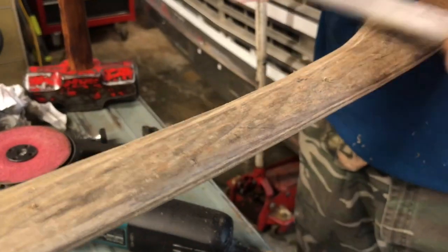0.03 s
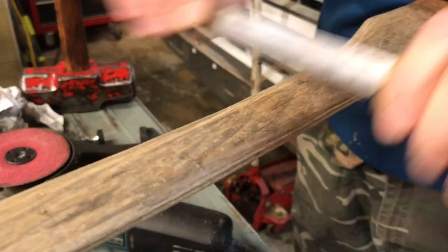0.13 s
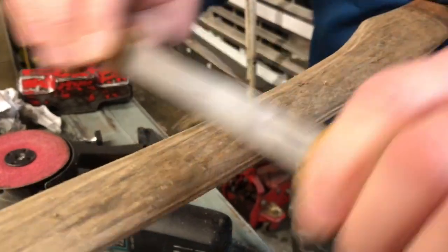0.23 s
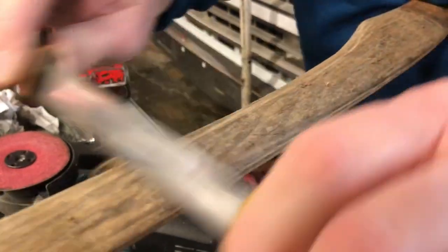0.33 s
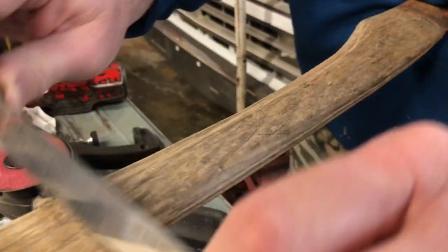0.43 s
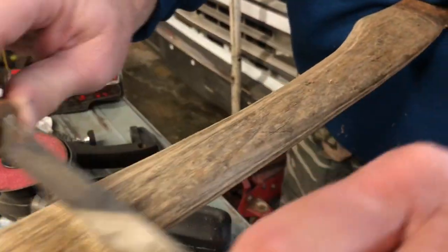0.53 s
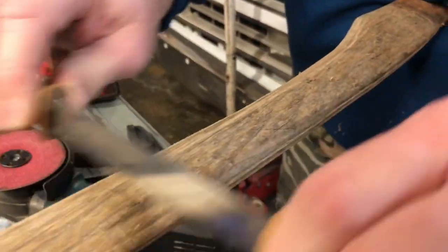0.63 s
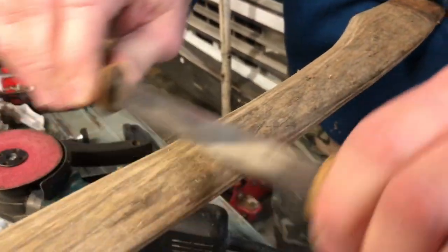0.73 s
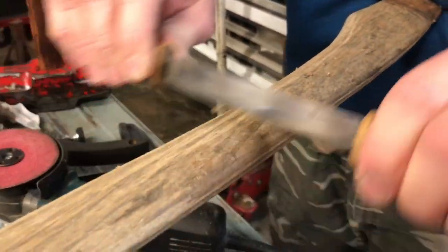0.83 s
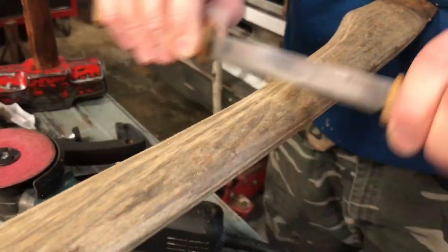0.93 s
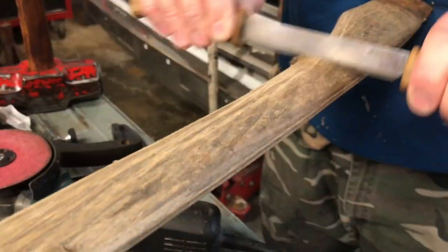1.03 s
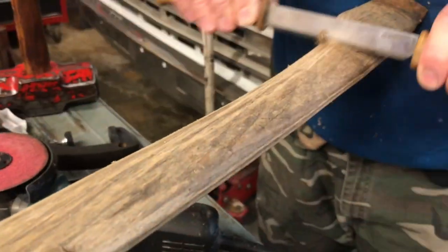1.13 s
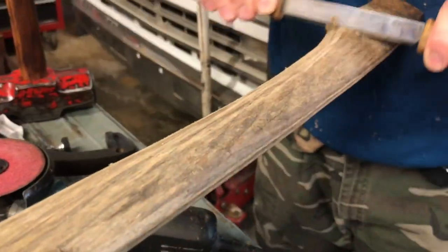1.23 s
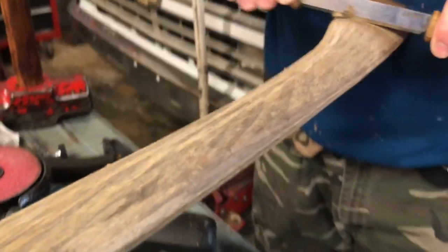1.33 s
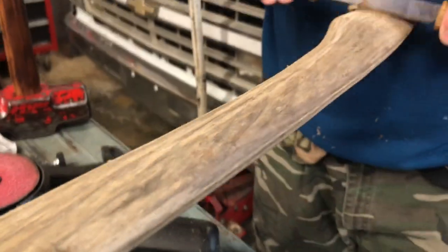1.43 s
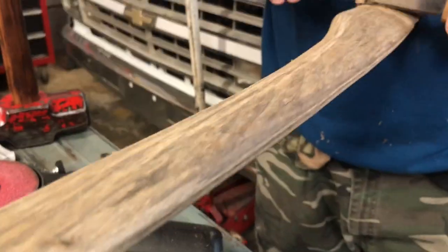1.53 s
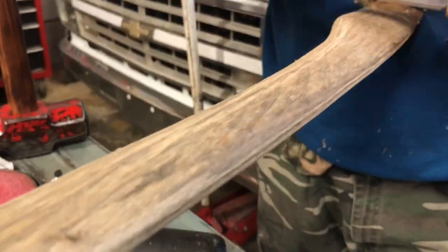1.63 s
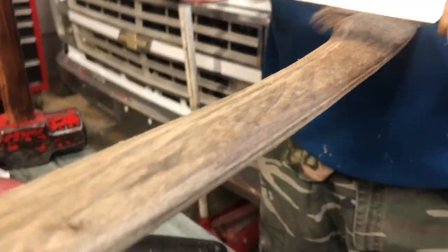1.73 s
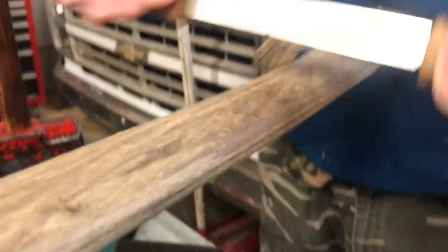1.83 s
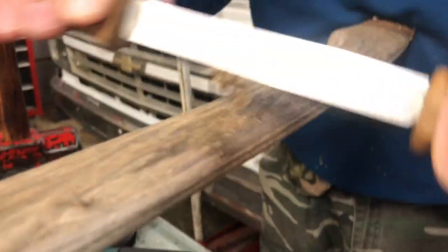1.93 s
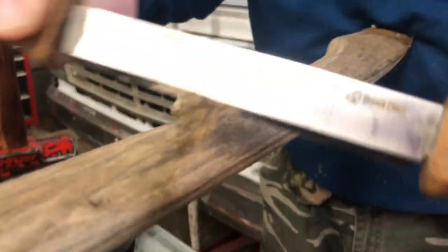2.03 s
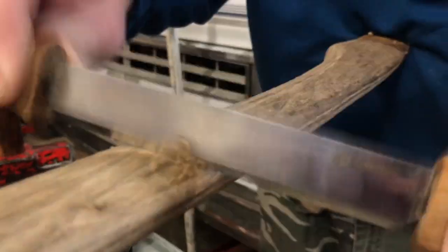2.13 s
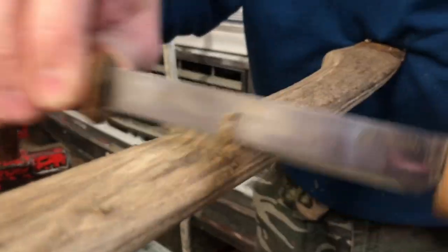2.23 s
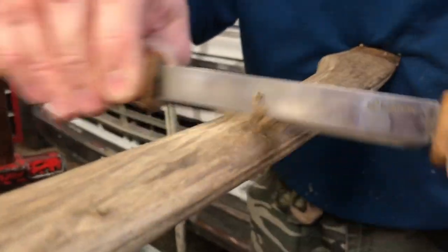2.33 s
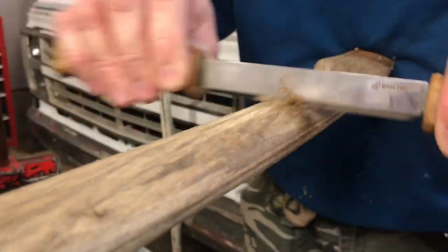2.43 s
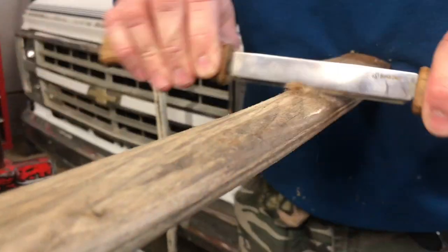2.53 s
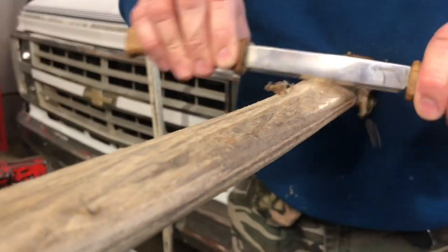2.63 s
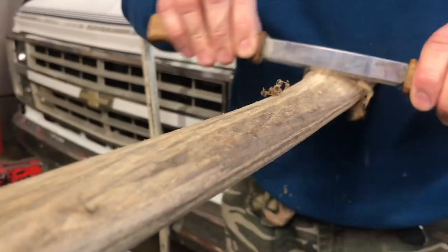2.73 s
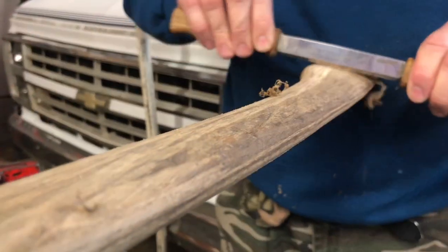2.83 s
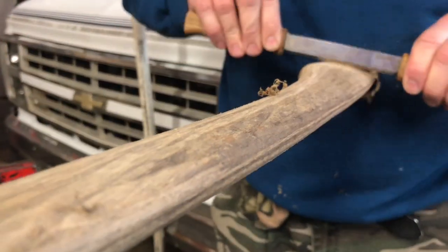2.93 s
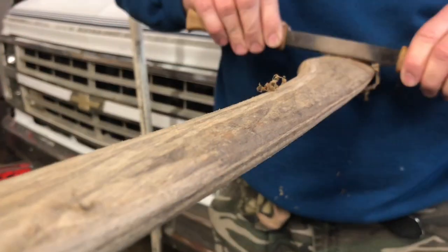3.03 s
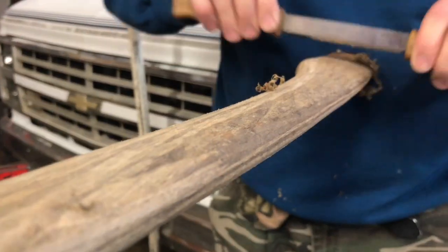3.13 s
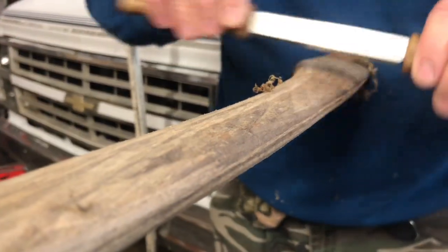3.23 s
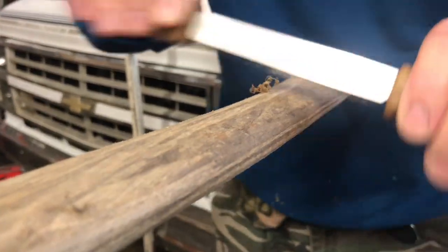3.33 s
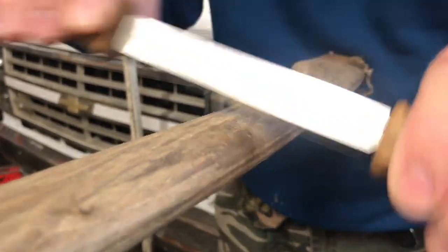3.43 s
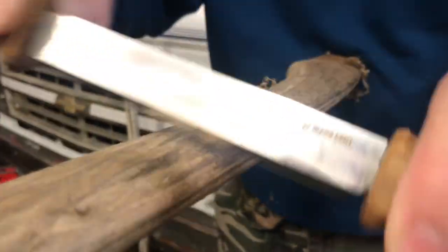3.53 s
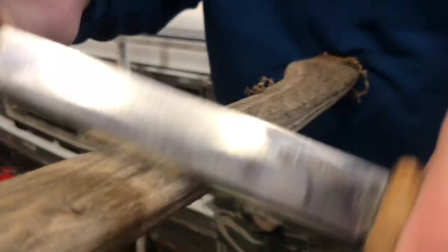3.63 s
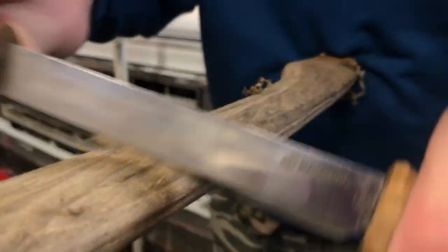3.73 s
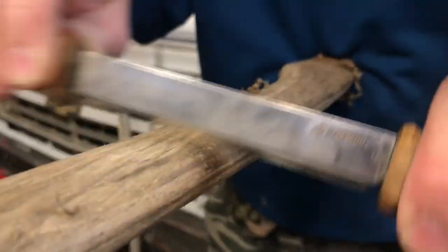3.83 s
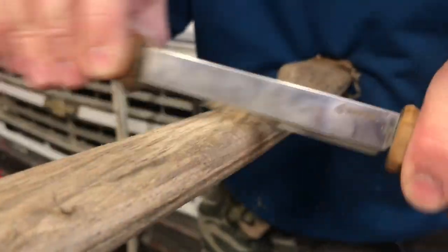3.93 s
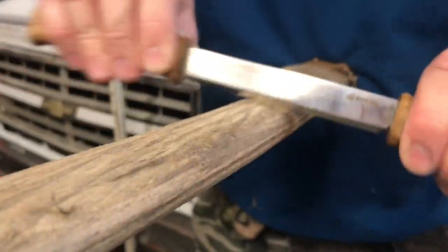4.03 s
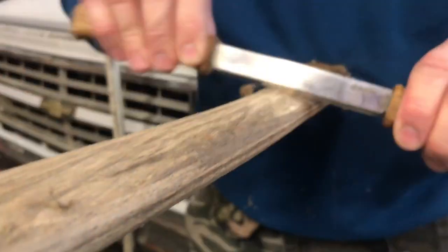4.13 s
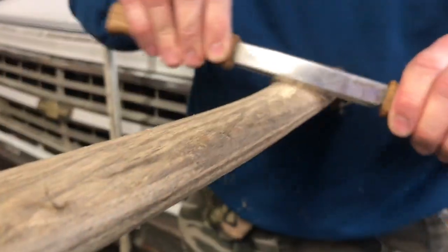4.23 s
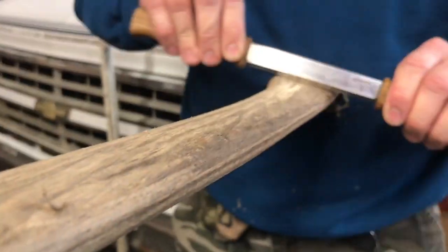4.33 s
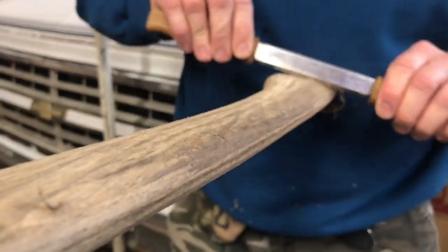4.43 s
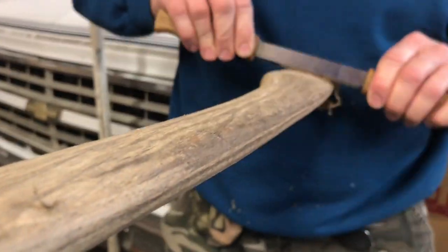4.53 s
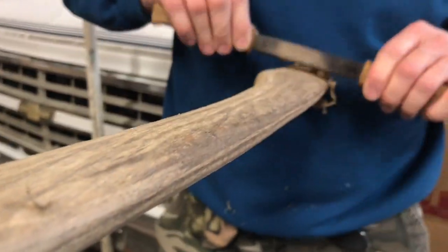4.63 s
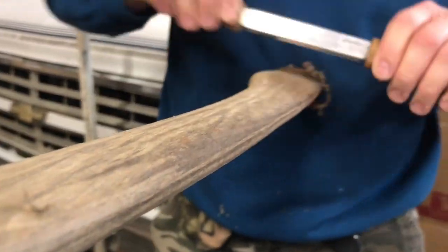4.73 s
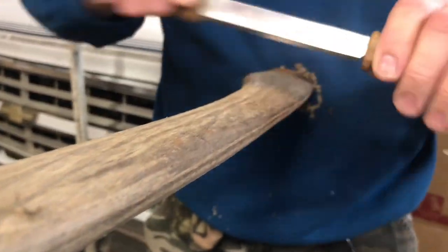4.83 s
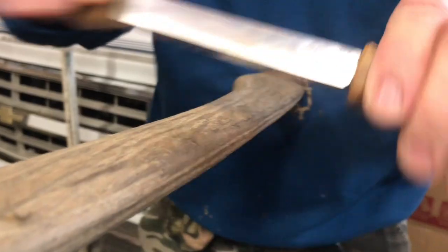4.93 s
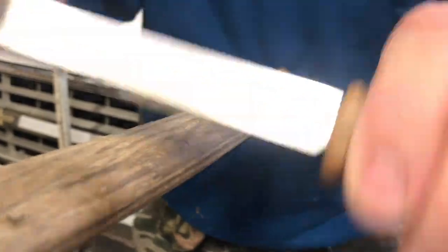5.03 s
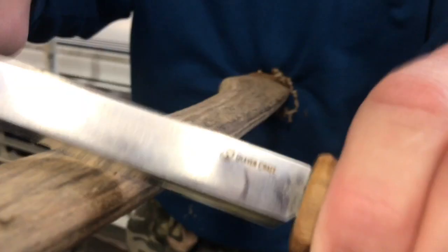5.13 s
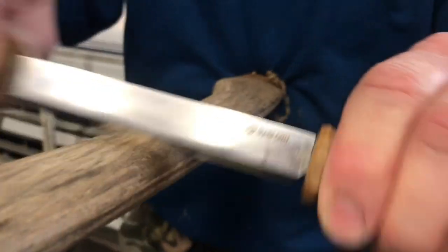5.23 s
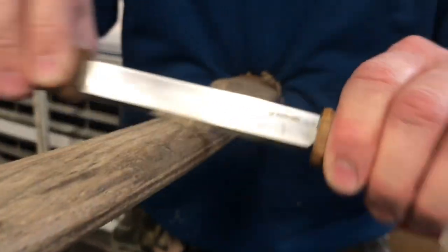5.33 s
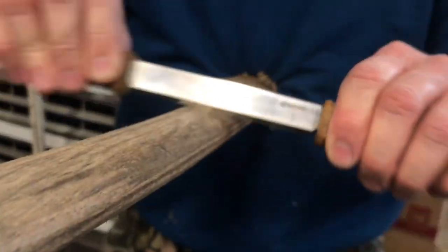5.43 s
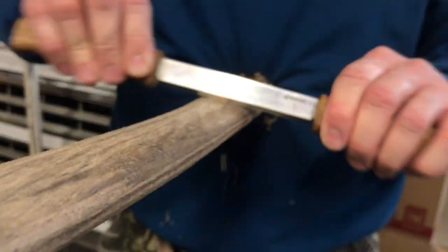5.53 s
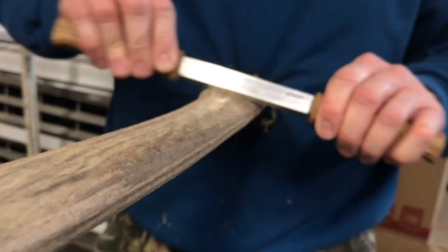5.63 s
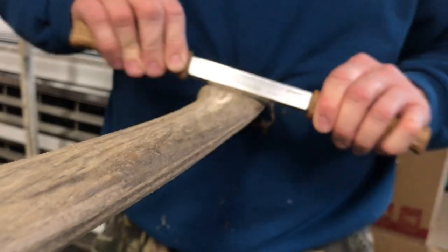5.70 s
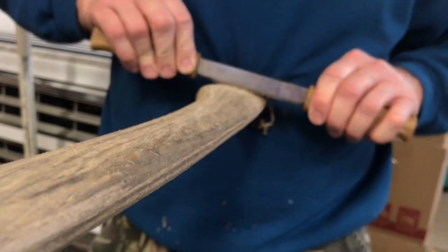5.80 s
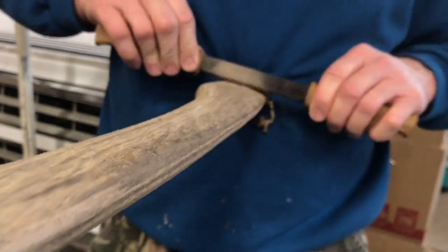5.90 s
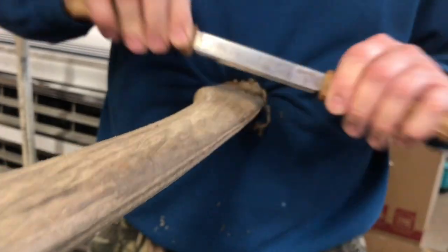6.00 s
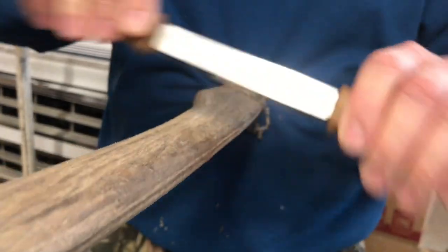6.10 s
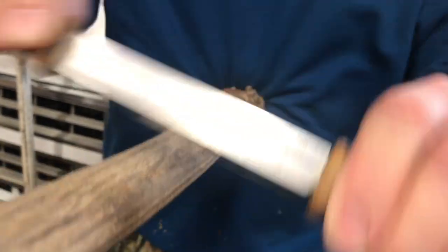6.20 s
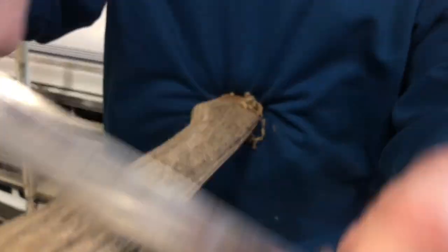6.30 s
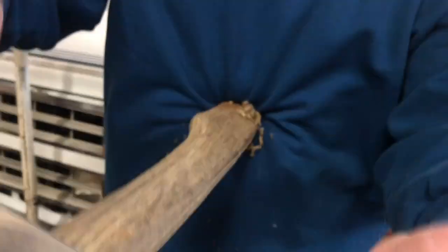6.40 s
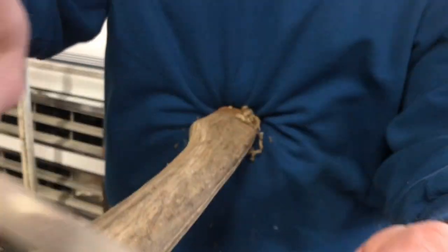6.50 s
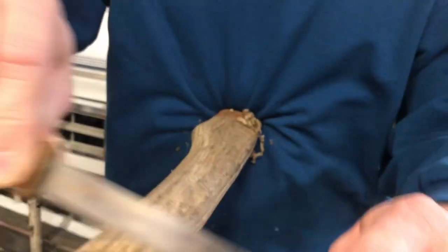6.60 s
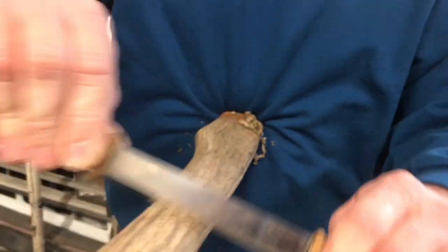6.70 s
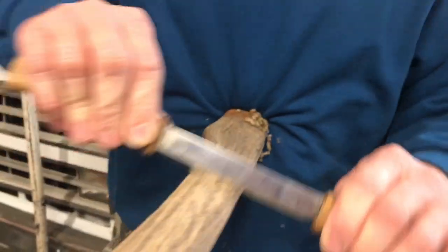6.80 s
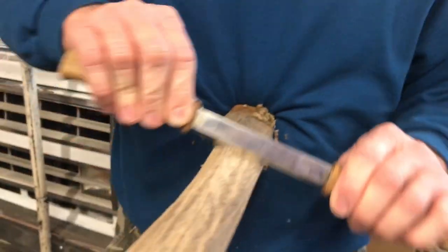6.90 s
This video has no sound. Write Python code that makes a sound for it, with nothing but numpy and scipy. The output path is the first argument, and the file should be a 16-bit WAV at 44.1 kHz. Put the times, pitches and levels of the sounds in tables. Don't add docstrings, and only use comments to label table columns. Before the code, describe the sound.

A small workshop, heard through a phone microphone close to the work, with low rumble, faint hiss and mains hum. Sleeves rustle softly and a few chips tick until 0.57 s, when a steel blade knocks onto a dry wooden handle and rasps along it until 1.6 s, gritty and chattering, with a dull bump near the end. Cloth rustles and the grip faintly squeaks. At 2.2 s comes the hardest clack with a loud crack, then a scrape to 3.1 s. A shaving snaps at 3.26 s. A duller landing at 3.7 s drags to 4.7 s; a brighter one at 5.2 s drags to 5.9 s. Crisp snaps cluster around 6.17 s, with quick brushing cloth. The lightest knock falls at 6.46 s, a splinter breaks sharply at 6.59 s, and the last scrape continues to about 6.96 s. The room adds only a short tail.

```python
import sys
import numpy as np
from scipy import signal
from scipy.fft import rfft, irfft
from scipy.io import wavfile
from scipy.ndimage import uniform_filter1d

SR = 44100
rng = np.random.default_rng(int(sys.argv[2]) if len(sys.argv) > 2 else 0)


def digitize_waveform(pressure):
    field = np.atleast_2d(pressure).T
    bounded = np.clip(field, -1, 1)
    quanta = np.round(bounded * 32767).astype(np.int16)
    wavfile.write(sys.argv[1], SR, quanta)


def elevation(decibels):
    levels = np.asarray(decibels, float)
    return 10 ** (levels / 20)


N = 306936

# start_s, end_s, first_db, last_db, bright_db
RUSTLES = [
    (0, 0.576, -58, -62.5, -4),
    (1.598, 2.183, -58.5, -67, 1),
    (2.169, 2.194, -57, -50, -1),
    (3.081, 3.268, -57, -56.5, 4),
    (3.269, 3.713, -55, -66.5, -1),
    (4.682, 5.168, -51.5, -78.5, -2.5),
    (5.938, 6.165, -51, -62, 0.5),
    (6.184, 6.362, -68, -71, 20.5),
    (6.201, 6.364, -65, -48, 11),
    (6.342, 6.443, -53, -88, 18),
]
# low_hz, high_hz
CLOTH_BANDS = [(400, 2000), (2000, 5500), (5500, 15800)]
# start_s, end_s, pitch_hz, width_hz, level_db
SQUEAKS = [
    (1.75, 1.94, 5600, 350, -73.5),
    (0, 0.45, 1100, 46, -66.5),
    (.1, .5, 1460, 70, -69),
    (3.27, 3.7, 880, 80, -64),
    (3.08, 3.26, 2300, 3000, -52),
    (3.28, 3.55, 4000, 1200, -70),
]
# frequency_hz, density_db (per Hz)
SHOP_AIR = [(13, -39), (22, -21.5), (49, 5.5), (88, -4), (141, 0), (306, -14), (361, -15), (829, -23),
            (1030, -20), (2440, -36.5), (4020, -37), (10300, -44.5), (12900, -41), (15200, -45.5),
            (16500, -50.5)]
# pitch_hz, width_hz, level_db
MAINS_HUM = [(118.7, 6.9, -54), (163, 28, -66.5), (65.3, 15, -58.5)]
# frequency_hz, t60_s
ROOM_DECAY = [(200, 1), (1000, 0.23), (4000, 0.31), (9000, 0.13), (16000, 0.096)]
# start_s, peak_db, centre_hz, width_hz
TICKS = [(0.271, -45, 4667, 2500), (0.302, -40.5, 3750, 2315), (0.38, -35, 2840, 3000),
         (1.6994, -54, 3950, 2700), (1.98, -42.5, 7280, 2315), (1.9924, -54, 2980, 2500),
         (2.0265, -49.5, 3560, 2315), (6.1728, -42.5, 1836, 1111), (6.444, -49, 10000, 4000),
         (6.507, -34, 9000, 5000), (3.263, -36, 3200, 2500), (6.329, -39, 2200, 1500),
         (6.1800, -29, 1836, 1111), (4.9344, -59, 3120, 2510), (4.985, -47, 1500, 1900),
         (5.008, -51, 4000, 2500), (6.123, -41.5, 1200, 1500), (6.354, -26, 3333, 2400),
         (6.386, -40, 9300, 2500)]
# start_s, peak_db, centre_hz, width_hz
SPLINTER = [
    (6.5882, -15, 2600, 3500),
    (6.5884, -16, 8000, 8000),
]
# start_s, peak_db
SHAVINGS = [
    (3.263, -28),
    (6.131, -39.5),
    (6.1728, -22),
    (6.1791, -29),
    (6.1874, -31),
]
# start_s, peak_db, crack_db, bright_db (per octave), place (0-1 along the handle)
LANDINGS = [
    (0.5739, -9, -22, -1, .28),
    (2.1943, -4, -8, 0.5, 0.24),
    (3.721, -9, -14, -0.1, 0.42),
    (5.188, -6, -18, 1.5, .485),
    (6.4569, -12.5, -14.5, -1.2, 0.41),
]
# pitch_hz, width_hz, level_db
LANDING_MODES = [(248, 380, -14), (558, 60, -3), (903, 46, -2.5), (1056, 50, -3), (1387, 170, 1.6),
                 (2250, 92, -10.5), (2920, 98, -13), (3256, 150, -12), (3925, 208, -4.5), (4500, 180, -11),
                 (5620, 130, -25.5), (6840, 210, -22), (8560, 180, -32), (10500, 200, -28.5)]
# pitch_hz, width_hz, level_db
HANDLE_THUD = [(233.4, 23, -12), (935, 27, -9.5)]
# time_s, drag_db (on the blade), bite_db (into the wood)
STROKES = [
    [(0.585, -44, 7), (0.623, -39, -6), (0.691, -28.5, -11.5), (0.805, -26, -12), (1.113, -32, -1.5),
     (1.197, -33.5, 1.5), (1.505, -32.5, 2.5), (1.6, -74, 27)],
    [(2.205, -56, 32), (2.233, -37.5, -10), (2.273, -31, -2.5), (2.467, -24, -13), (2.655, -32.5, 0.5),
     (2.867, -28.5, -6), (3.0, -31, 0.5), (3.1, -63, 24.5)],
    [(3.732, -66, 25), (3.77, -38, 1.5), (3.834, -29, -9), (3.94, -25.5, -9.5), (4.34, -29.5, -3.5),
     (4.546, -35, -1), (4.602, -33.5, 3.5), (4.68, -78, 30)],
    [(5.2, -49, 14), (5.234, -28.5, -7), (5.345, -25, -15), (5.39, -27.5, -9), (5.64, -29.5, -7.5),
     (5.754, -32.5, -7.5), (5.886, -33, 1.5), (5.94, -71, 30)],
    [(6.468, -78, 21), (6.492, -43.5, 0), (6.558, -32, 0), (6.668, -25, -8), (6.752, -24.5, -16.5),
     (6.856, -29, -4.5), (6.96, -30.5, 0.5)],
]
# early_hz, middle_hz, late_hz (chatter), ring_hz (upper ring), damping (by the palms)
GRIPS = [
    (3770, 3540, 4040, 8500, 1.25),
    (4300, 4120, 3870, 8700, 1.18),
    (4000, 4170, 3960, 8850, 0.99),
    (4030, 4030, 4090, 9260, 1.01),
    (4250, 4010, 4150, 7700, 0.99),
]
# pitch_hz, width_hz, start_db, middle_db, end_db
LOW_WOOD = [(285, 58, -11, -12, -16.5), (452, 85, -37.5, -27, -8.5), (627.5, 64, -30, -5, -0.5),
            (750, 360, 9, -9.5, 1), (886, 100, -6.5, -0.5, -3), (1160, 120, -7.5, 1, 3),
            (1378, 256, 3.5, -2, -1), (1681, 130, 2, -9.5, -5.5)]
HIGH_WOOD = [(1750, 113, -12, -13, -11), (2064, 81, -12, 1.5, -2.5), (2582, 330, -11, 4.5, -1.5),
             (2763, 283, 0, 9.5, -8), (3154, 200, 1.5, 3.5, -8)]
BLADE_MODES = [(5670, 740, -2, -16, -19), (5690, 130, -19, -24, -12), (6575, 1110, -1.5, 9, 12),
               (7400, 620, -19.5, -11, -2), (9100, 1900, 1.5, 5, 2), (12100, 1180, 1.5, 0.5, -26),
               (14300, 1400, -7.5, -4, -10)]
# frequency_hz, density_db (per Hz)
TEARING = [(88, -41.5), (150, -14), (475, -14), (905, -5.5), (1900, -8), (3920, -5), (5360, -14),
           (12400, -18.5), (16000, -33)]
# start_s, end_s, from_hz, to_hz, level_db
SINGING = [(.75, 1.02, 2060, 2230, -37.5), (0.82, 1.38, 2300, 2150, -38), (1.37, 1.53, 2160, 2250, -32.5),
           (1.18, 1.3, 3200, 3000, -38), (1.22, 1.3, 696, 586, -36.5), (2.3, 2.52, 1940, 2200, -39.5),
           (2.44, 2.58, 2300, 2950, -35), (2.77, 2.9, 2460, 2910, -33.5), (2.74, 3.04, 1163, 1150, -35.5),
           (3.95, 4.45, 2550, 2730, -39), (4.2, 4.55, 2220, 2070, -39), (5.21, 5.31, 1630, 1880, -37),
           (5.63, 5.81, 2000, 2060, -38.5), (5.81, 5.89, 1720, 1660, -33.5), (5.25, 5.62, 2620, 2500, -43),
           (6.52, 6.84, 926, 890, -34), (6.8, 6.96, 1540, 1660, -35), (6.58, 6.95, 2560, 2550, -39)]
# start_s, peak_db, low_db (share of the lowest mode)
RIDGES = [
    (1.507, -16, -8.5),
    (3.012, -19, -16),
    (4.585, -26, 5),
    (5.898, -18.5, -8),
    (6.355, -33.5, -6),
]
# centre_hz, width_hz, depth (0-1)
PORT_DIPS = [(10400, 500, .45), (13600, 700, .2)]
# low_hz, high_hz
MIC_BAND = (38, 15800)


def evened(x):
    return x / np.sqrt(np.mean(x ** 2) + 1e-20)


def add(mix, s, sound):
    part = mix[round(s * SR):][:len(sound)]
    part += sound[:len(part)]


def read(points, hz):
    f, value = np.transpose(points)
    return np.interp(np.log(hz + 1), np.log(f + 1), value)


def coloured(x, spectrum):
    hz = np.fft.rfftfreq(len(x), 1 / SR)
    return evened(irfft(rfft(x) * elevation(read(spectrum, hz)), len(x)))


def resonate(x, hz, width):
    turn = np.exp(2j * np.pi * np.cumsum(hz * np.ones(len(x))) / SR)
    r = np.exp(-np.pi * abs(width) / SR)
    return 2 * (turn * signal.lfilter([1 - r], [1, -r], x / turn + 1e-18)).real


def drift(n, per_s):
    t = np.arange(0, n + 64, 64) / SR
    speeds = np.geomspace(per_s / 8, per_s, 12)
    slow = sum(np.sin(2 * np.pi * (f * t + rng.random())) for f in speeds)
    return np.interp(np.arange(n) / SR, t, evened(slow))


def shop():
    air = elevation(-49 + 0.25 * drift(N, 6.5)) * coloured(rng.standard_normal(N), SHOP_AIR)
    return air + sum(elevation(db) * evened(resonate(rng.standard_normal(N), hz, w)) for hz, w, db in MAINS_HUM)


def rustle(start, end, first_db, last_db, bright_db):
    t = np.arange(start, end, 1 / SR)
    quiet_end = end if first_db > last_db else start
    swing = (abs(t - quiet_end) / (end - start)) ** 4.1
    level_db = min(first_db, last_db) + abs(first_db - last_db) * swing + 1.8 * drift(len(t), 80)
    shares_db = [0, -8 + bright_db, -16.5 + 1.3 * bright_db]
    grains = rng.standard_normal((3, len(t))) * elevation(.9 * drift(len(t), 90))
    parts = []
    for band, grain in zip(CLOTH_BANDS, grains):
        sos = signal.butter(2, band, "bandpass", fs=SR, output="sos")
        parts.append(evened(signal.sosfilt(sos, grain)))
    parts[1] = evened(parts[1] + 1.3 * resonate(parts[1], 2700, 700))
    parts[0] = evened(parts[0] + 2.2 * resonate(parts[0], 1160, 90) + 1.1 * resonate(parts[0], 1450, 120))
    cloth = sum(elevation(level_db + db) * p for db, p in zip(shares_db, parts))
    return start, cloth * signal.windows.tukey(len(t), .12)


def squeak(start, end, hz, width, db):
    n = round((end - start) * SR)
    whistle = resonate(resonate(rng.standard_normal(n), hz, width), hz, width)
    return start, elevation(db) * evened(whistle) * signal.windows.tukey(n, .5)


def tick(peak_db, hz, width):
    t = np.arange(2000) / SR
    spray = (4 * (t == 0) + rng.standard_normal(len(t))) * elevation(-60 * t / .006)
    burst = resonate(spray, hz, width)
    return elevation(peak_db + 4.0) * burst / abs(burst).max()


def shaving(peak_db):
    return tick(peak_db, hz=6000, width=11000)


def struck(bright_db, place):
    return [(hz, w, db + bright_db * np.log2(hz / 1018) + 3 * np.cos(2 * np.pi * place * k))
            for k, (hz, w, db) in enumerate(LANDING_MODES)]


def damped(hz, width, t):
    return np.exp(-np.pi * width * t) * np.sin(2 * np.pi * hz * t)


def knock(peak_db, crack_db, modes):
    t = np.arange(3000) / SR
    ring = sum(w * elevation(db) * damped(hz, 1.2 * w, t) for hz, w, db in modes)
    ring = ring * (1 - np.exp(-(t / 0.00099) ** 2))
    crack = resonate(rng.standard_normal(len(t)), 7000, 6000)
    crack = crack * elevation(crack_db - 60 * t / 0.0078) * np.minimum(t / 0.00066, 1) ** 2
    return elevation(peak_db + 4.0) * (ring / abs(ring).max() + crack)


def mottled(x, patchy_db):
    z = signal.stft(x, nperseg=1024, noverlap=768)[2]
    patches = uniform_filter1d(rng.standard_normal(z.shape), size=4, axis=0)
    patches = evened(uniform_filter1d(patches, size=12, axis=1))
    return evened(signal.istft(z * elevation(patchy_db * patches), nperseg=1024, noverlap=768)[1][:len(x)])


def body(slips, modes, wander_db, moved={}):
    n = len(slips)
    way = np.arange(n) / SR / .9
    shares = [elevation(np.interp(way, [0, .5, 1], db) + wander_db * drift(n, 12.37)) for _, _, *db in modes]
    paths = [moved.get(k, hz) * (1 + .009 * drift(n, 5)) for k, (hz, *_) in enumerate(modes)]
    total = 0
    for share, hz, (_, w, *_) in zip(shares, paths, modes):
        total = total + share * evened(resonate(resonate(slips, hz, 1.01 * w), hz, 0.96 * w))
    return total / np.sqrt(sum(s ** 2 for s in shares))


def fibre_slips(n):
    size = elevation(2. * np.minimum(rng.exponential(1, n), 4)) * rng.standard_normal(n)
    happens = rng.random(n) < 12000 / SR
    return mottled(size * happens * elevation(0.55 * drift(n, 200)), patchy_db=2.5)


def stroke(rows, grip):
    s, *columns = np.transpose(rows)
    t = np.arange(s[0], s[-1], 1 / SR)
    n = len(t)
    chatter_db, bite_db = (np.interp(t, s, c) for c in columns)
    way = (t - s[0]) / (s[-1] - s[0])
    drag_db = chatter_db + 30
    high_db = -5.5 + .3 * bite_db + 0.12 * drag_db + 4.5 * way
    hiss_db = -4 - 0.2 * bite_db - 0.12 * drag_db
    *chatter_hz, ring_hz, damping = grip
    hz = np.interp(way, [0, .5, 1], chatter_hz)
    ring_hz, top_hz = (f * (1 + 0.032 * drift(n, 6)) for f in (ring_hz, 12200))
    slips = fibre_slips(n)
    chatter = resonate(resonate(slips, hz, 600 * damping), hz * 0.99, 670 * damping)
    chatter = evened(chatter + .5 * resonate(slips, hz, 250 * damping))
    wood = elevation(bite_db - 2.0) * body(slips, LOW_WOOD, 2.45) + elevation(high_db - 1.0) * body(slips, HIGH_WOOD, 2.7)
    edge = elevation(hiss_db - 5.0) * body(slips, BLADE_MODES, 1.6, moved={4: ring_hz, 5: top_hz})
    torn = coloured(mottled(rng.standard_normal(n), patchy_db=4.5), TEARING)
    sound = chatter + wood + edge + elevation(.5 * (bite_db + hiss_db) + 2.0) * torn
    depth = np.clip(.75 + .35 * drift(n, 9), 0, 1)
    sound = sound - depth * resonate(sound, 13500, 1100)
    return s[0], elevation(chatter_db) * sound * signal.windows.tukey(n, .02)


def singing(start, end, from_hz, to_hz, db):
    n = round((end - start) * SR)
    hz, width = np.linspace(from_hz, to_hz, n), 40 + .06 * from_hz
    ring = resonate(resonate(rng.standard_normal(n), hz, width), hz, width)
    return start, elevation(db) * evened(ring) * signal.windows.tukey(n, .6)


def ridge_bump(peak_db, low_db):
    t = np.arange(3000) / SR
    ring = 0
    for k, (hz, w, *_, end_db) in enumerate(LOW_WOOD):
        lowest_db = 16.0 + low_db if k == 0 else 0
        ring = ring + elevation(end_db + lowest_db) * damped(hz, 1.1 * w, t)
    ring = ring * np.minimum(t / 0.0021, 1)
    return elevation(peak_db) * ring / abs(ring).max()


def room(x):
    taps = rng.standard_normal(SR // 2) * (np.arange(SR // 2) > 350)
    hz, t, z = signal.stft(taps, SR, nperseg=256)
    tail = signal.istft(z * elevation(-60 * t / read(ROOM_DECAY, hz)[:, None]), SR, nperseg=256)[1]
    return signal.fftconvolve(x, tail / np.linalg.norm(tail))[:N]


def scene():
    work, near = np.zeros(N), np.zeros(N)
    for row in RUSTLES:
        add(near, *rustle(*row))
    for row in SQUEAKS:
        add(near, *squeak(*row))
    for s, *shape in TICKS + SPLINTER:
        add(work, s, tick(*shape))
    for s, peak_db in SHAVINGS:
        add(work, s, shaving(peak_db))
    for s, peak_db, crack_db, *spot in LANDINGS:
        add(work, s, knock(peak_db, crack_db, struck(*spot) + HANDLE_THUD))
    for rows, grip in zip(STROKES, GRIPS):
        add(work, *stroke(rows, grip))
    for row in SINGING:
        add(work, *singing(*row))
    for s, *shape in RIDGES:
        add(work, s, ridge_bump(*shape))
    return (work + elevation(-17.5) * room(work) + near + shop())[None]


def roll_off(x):
    return signal.sosfilt(signal.butter(12, 17010, fs=SR, output="sos"), x)


def record(dry):
    hz = np.fft.rfftfreq(N, 1 / SR)
    low_hz, high_hz = MIC_BAND
    gain = 1 / np.sqrt((1 + (low_hz / (hz + 1)) ** 10) * (1 + (hz / high_hz) ** 600))
    for centre_hz, width, depth in PORT_DIPS:
        gain = gain * (1 - np.clip(depth, 0, 1) * np.exp(-((hz - centre_hz) / width) ** 2))
    mix = irfft(rfft(dry) * gain, N)
    return roll_off(mix)


dry = scene()
out = record(dry)
digitize_waveform(out)
```